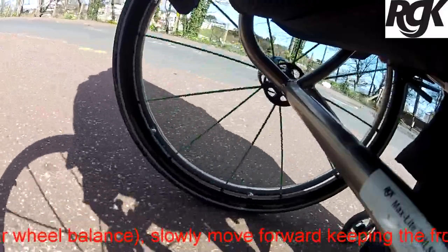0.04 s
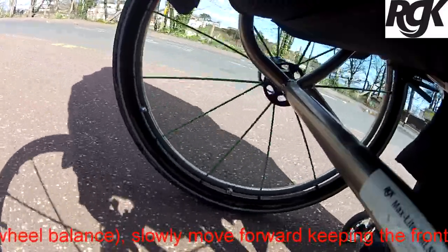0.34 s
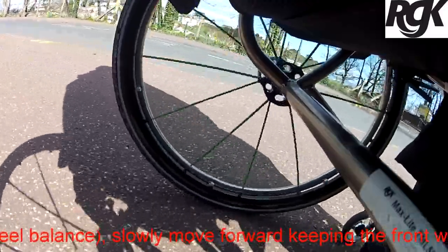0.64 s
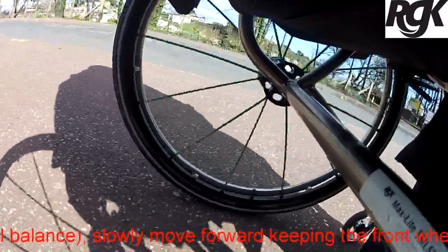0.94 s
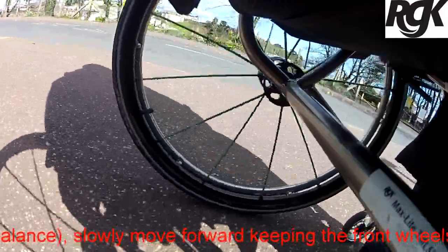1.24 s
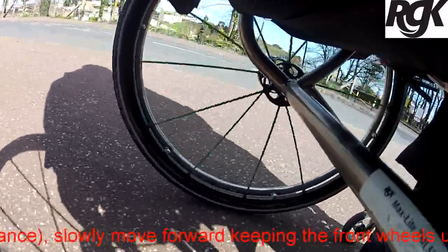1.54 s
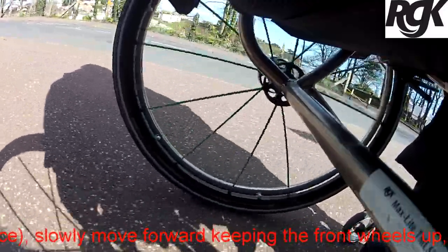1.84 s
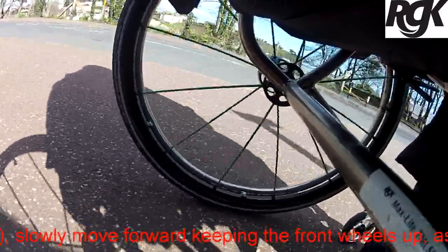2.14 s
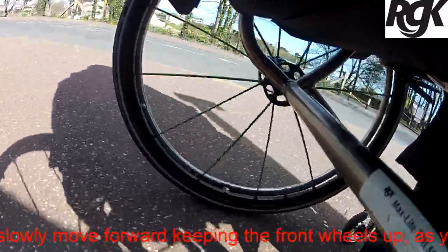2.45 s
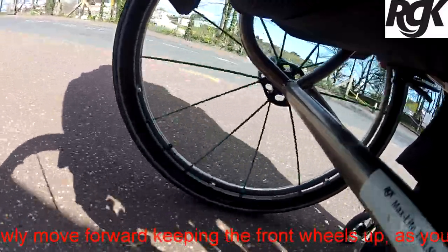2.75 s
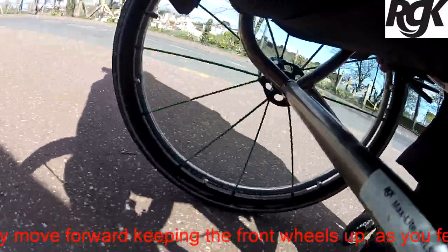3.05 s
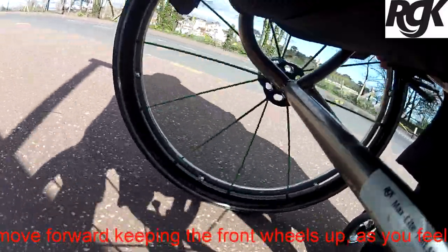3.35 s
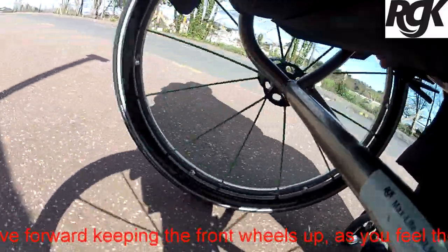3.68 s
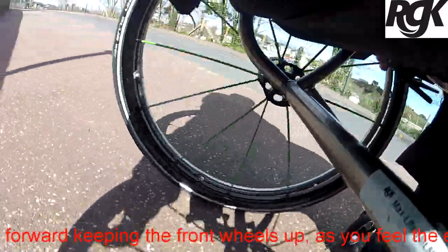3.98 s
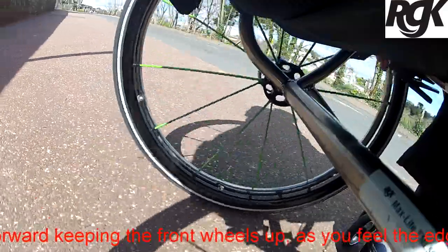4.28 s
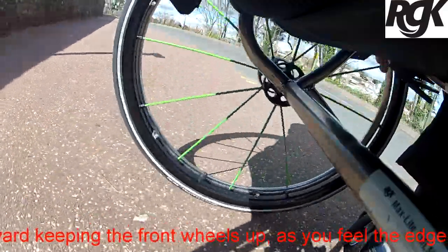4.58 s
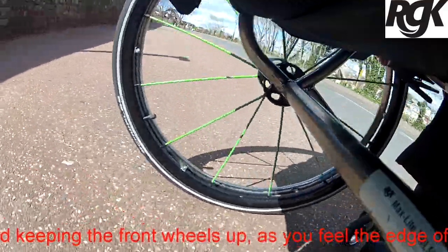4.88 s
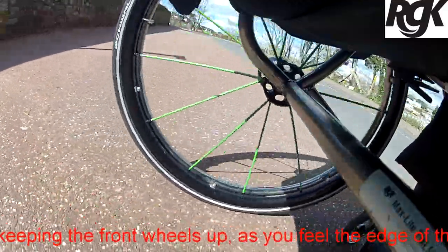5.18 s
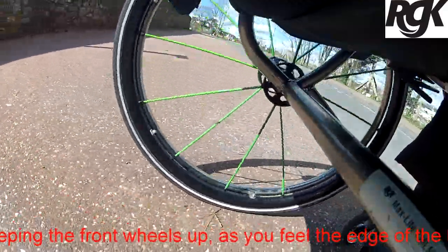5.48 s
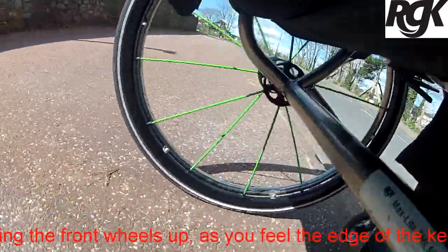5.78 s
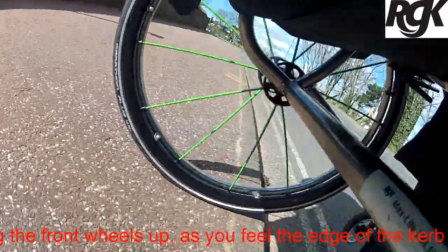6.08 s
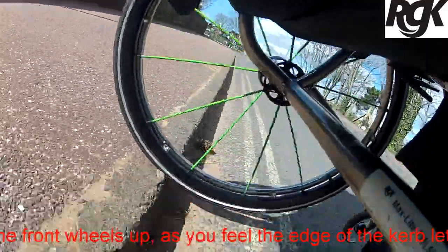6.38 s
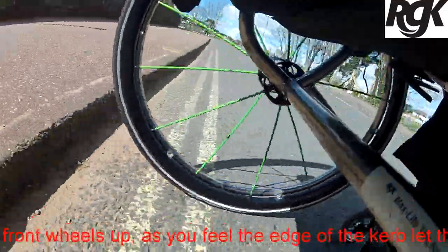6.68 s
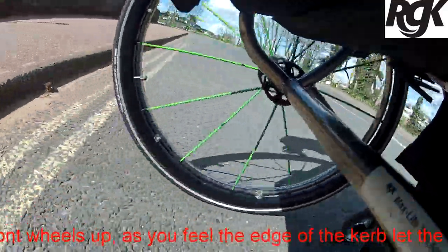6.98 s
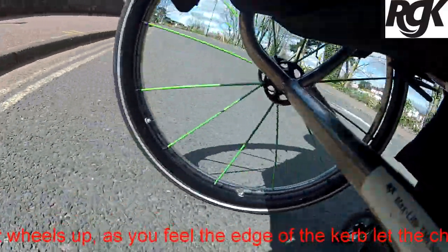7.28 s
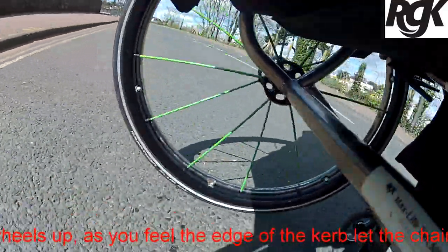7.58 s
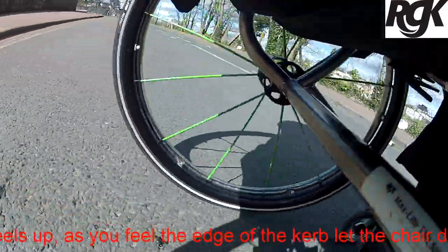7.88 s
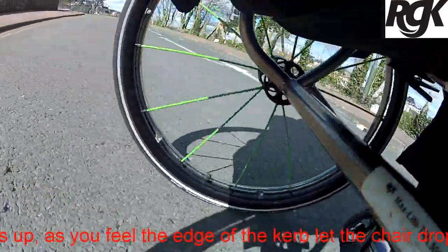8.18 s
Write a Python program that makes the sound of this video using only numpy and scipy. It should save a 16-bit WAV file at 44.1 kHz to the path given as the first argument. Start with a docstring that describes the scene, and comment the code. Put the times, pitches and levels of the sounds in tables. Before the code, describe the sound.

Heard close up from a microphone on its frame, a wheelchair rumbles over rough outdoor pavement with scattered ticks and rattles. Hands brush the push rims and the rolling fades almost away. A sharp metallic crack and clatter follow as the wheels land off a kerb, and the chair carries on along a coarser road with a hollower rumble, crackling grit and busy rattling.

```python
"""Tyre rumble and a ringing frame: a wheelchair rolls on its rear wheels along a gritty pavement.
A loose fitting rattles, grit snaps under the tread, and palms rub the push rims as the chair slows.
At 6.7 s it drops off a kerb with a clatter and rolls on over a rougher road.
A microphone on the frame hears the tyres through the tubes; sample-and-hold adds a metallic fizz."""
import sys
import numpy as np
from scipy import signal
from scipy.io import wavfile
from scipy.ndimage import uniform_filter1d

SR = 44100
rng = np.random.default_rng(int(sys.argv[2]) if len(sys.argv) > 2 else 0)


def log_audio(samples):
    """Write samples as a 16-bit WAV file to the path given in sys.argv[1]."""
    # one column per channel
    frames = np.atleast_2d(samples).T
    # limit to full scale, then quantise
    limited = np.clip(frames, -1, 1)
    pcm = np.round(limited * 32767).astype(np.int16)
    wavfile.write(sys.argv[1], SR, pcm)


N = 371763
TIME_S = np.arange(N) / SR
KERB_S = 6.688

# shaking trend, sinking as the chair slows: (time [s], level re steady rolling [dB])
SHAKE_TREND = [(0, 0.27), (1.9, -.5), (2.3, 0), (2.7, -0.5), (3.9, 0.75), (4.4, 0), (5.1, -2), (5.35, -5),
               (5.65, -4), (5.87, -5.5), (6.0, -13.5), (6.5, -19), (6.66, -18), (6.72, -0.5), (7.15, 2),
               (7.38, -2), (7.5, 2), (8.43, 3)]
# uneven patches: (centre [s], length [s], swell [dB])
BUMP_SWELLS = [(0.173, 0.061, 1), (0.584, .16, 2), (.985, 0.033, 4.5), (1.474, .12, 3), (2.355, .12, 1.5),
               (2.504, 0.21, 2), (2.744, 0.16, 2), (3.033, 0.2, 1), (3.225, 0.092, 2), (3.543, 0.15, 3.5),
               (4.266, 0.071, 3), (5.06, 0.06, 1.5), (6.295, 0.15, 10), (6.949, 0.18, 6),
               (7.123, 0.067, 3.5), (7.497, 0.3, 3.5), (7.629, 0.16, 5), (7.73, 0.073, 4), (7.8, 0.11, 3),
               (7.993, .1, 4.5), (8.181, 0.026, 3.5), (8.413, 0.053, 3.5)]
# tyres on pavement: (frequency [Hz], relative density [dB])
PAVEMENT_SPECTRUM = [(15, -25), (28, -25), (45, -7.5), (65, -5), (97, 2.5), (128, -6), (172, -6),
                     (215, -23.5), (305, -16), (420, -21.5), (530, -25.5), (800, -38), (1500, -68.5)]
# tyres on road: (frequency [Hz], relative density [dB])
ROAD_SPECTRUM = [(15, -19), (35, -16), (55, -11.5), (82, 3.5), (115, -4.5), (160, -9), (220, -21),
                 (310, -11.5), (420, -21.5), (540, -20.5), (800, -29), (1500, -65)]
# tyres landing and meeting bumps: (time [s], level [dB], frequency [Hz], t60 [s])
TYRE_THUMPS = [(6.686, -10, 65, 0.079), (6.688, -10.5, 194, 0.034), (6.715, -36, 310, 0.11),
               (6.79, -15, 116, 0.09), (6.792, -11, 363, 0.031), (6.924, -13.5, 267, .07),
               (7.388, -11, 380, 0.027), (7.609, -19, 394, 0.045), (8.392, -9, 320, 0.02)]
# frame and mount resonances: (frequency [Hz], nominal width [Hz], relative level [dB])
FRAME_MODES = [(642.2, 46.7, 0.5), (706, 63, -2.5), (728, 46, -4), (883.5, 94, -4.5), (1157, 270, -13),
               (1580, 200, -8), (1800, 126, -7), (1965, 87, -11), (2494, 100, -19.5), (2977, 134, -16),
               (3180, 88, -18), (3550, 56, -23), (3874, 153, -24), (4794, 400, -36)]
# jolts ringing one tube: (time [s], level [dB])
TUBE_PINGS = [(1.444, -19), (2.326, -21.5), (2.508, -17), (3.046, -21), (3.24, -19.5), (3.786, -19),
              (6.285, -27), (6.791, -11.5), (6.93, -6), (7.121, -7), (7.6, -12.5), (7.96, -12.5),
              (8.319, -32), (8.402, -11)]
# fine grit: (frequency [Hz], relative density [dB])
GRIT_SPECTRUM = [(300, -11), (600, -16), (1000, 2), (1200, 1), (1380, 2.5), (1850, 6.5), (2100, 0),
                 (2400, -16), (3050, -7), (3600, -25), (4300, -20), (4750, -15), (6000, -32), (7000, -65)]
# snapping stone: (frequency [Hz], relative density [dB])
STONE_SPECTRUM = [(300, -11), (700, 7), (1100, 4), (1500, 8.5), (2000, 10), (2500, 4.5), (3000, 4),
                  (4000, -7), (5000, -10), (6000, -21), (7000, -62)]
# distant murmur: (frequency [Hz], relative density [dB])
OUTDOOR_SPECTRUM = [(15, -31), (60, 9.5), (130, -3.5), (250, 1.5), (420, -9.5), (700, -4), (1000, -30),
                    (2000, -21.5), (5000, -30.5), (7000, -57)]
# loose fitting: (time [s], relative mid level [dB], treble re mid [dB], low ring re mid [dB])
FITTING_CLACKS = [(0.189, -28, -9, -9), (0.208, -30, -1, 5), (.309, -34, -12, 4), (.388, -34, -2, -13),
                  (.6278, -33, 2.5, 10.5), (.6933, -30.5, -0.5, 6), (.714, -35.5, -2, 8),
                  (.859, -29, -1, -8), (.9883, -26, -2, 4), (1.1329, -37, -4, 9),
                  (1.4418, -18.5, -12.5, -1.5), (1.687, -35, -3, 11), (1.82, -39, -12, -4),
                  (2.3261, -26.5, -4, 5), (2.3357, -32, -18, 10), (2.5136, -43, 4.5, -10),
                  (2.756, -33.5, -7, 12.5), (2.82, -33, -1.5, 9.5), (2.9948, -38.5, -1, 11),
                  (3.2587, -27.5, -9.5, -2), (3.5255, -29, -1.5, -12), (3.5738, -28.5, -5, -9),
                  (3.6812, -33.5, -8, 9.5), (3.7433, -30.5, -11, 2), (3.787, -31, -10, 5),
                  (6.2836, -33, -12, 5.5), (6.7185, -19.5, -5, 7), (6.7389, -17, -4.5, -5),
                  (6.7877, -17, -18, 5), (6.8022, -26.5, -2, 6), (6.8269, -31, -6, 10),
                  (6.879, -28.5, 3, -2), (6.9188, -15.5, -10.5, 0), (6.932, -21, -5, 6),
                  (6.9587, -14, -3.5, -0.5), (7.0462, -20.5, -2, 3.5), (7.087, -30.5, -4, 6),
                  (7.1215, -28.5, 6, -2), (7.1645, -22, -5, 7.5), (7.2919, -20, -6.5, 0),
                  (7.3756, -36.5, -13, 16), (7.448, -15, -10.5, 1), (7.476, -15, -12, -15),
                  (7.4839, -14, -20, 3.5), (7.499, -20, -2.5, 2), (7.5138, -19, -13, 5),
                  (7.5419, -21, -16, -10), (7.56, -26, -5, 3), (7.593, -25, -7, -2), (7.6095, -22, -8, 2),
                  (7.63, -22, 6, -17), (7.6487, -24, 4, 14.5), (7.6661, -23, 2, -2), (7.7045, -14, -11, 2),
                  (7.7142, -16, -26, 4), (7.7665, -21.5, 0, -8), (7.7969, -22.5, -8, 2.5),
                  (7.8183, -32, 2, 5), (7.88, -28, -7, -5), (7.9566, -24.5, -1, 4), (7.978, -17, -20, -3),
                  (8.0024, -20, 2.5, 0), (8.1084, -18.5, -7.5, 1.5), (8.1517, -21, -16, -9),
                  (8.173, -20.5, -1, 7.5), (8.2405, -20, -7, 4.5), (8.2954, -25, 0, 8.5),
                  (8.3208, -28.5, -1, 9.5), (8.3417, -26.5, -6, -3), (8.3925, -26, -1.5, 9)]
# grit snapping: (time [s], relative mid level [dB], treble re mid [dB], low knock re mid [dB])
GRIT_SNAPS = [(2.921, -29, -8.5, -4), (3.81, -28.5, -22, -4), (3.923, -23, -14, -2.5),
              (4.404, -28.5, -16, -10), (4.429, -24, -21, -11), (4.996, -36.5, -6, -2),
              (5.512, -31, -9, -15), (5.699, -41, -10, -8), (5.824, -42.5, 1, 6), (5.893, -27, -9, -22)]
# palm on rim: (frequency [Hz], relative density [dB])
RUB_SPECTRUM = [(500, -8), (1200, 3), (1450, 3), (1850, 9), (2100, 7), (2400, -1.5), (3100, -15),
                (3700, -41), (4300, -30), (4750, -13.5), (6000, -28), (7000, -55)]
# palms braking: (start [s], length [s], initial level [dB])
RUB_STROKES = [(3.2, 0.2, -43.5), (3.85, 1.27, -39), (5.42, 0.17, -48.5), (5.88, 0.11, -52),
               (6.36, 0.44, -53)]
# tight grip hissing: (frequency [Hz], relative density [dB])
SLIP_SPECTRUM = [(500, 2), (1400, -1.5), (2050, 5.5), (2400, -5), (3200, 1), (3700, -5.5), (4100, -4),
                 (5000, -8), (6000, -18), (7000, -52)]
# tight grip slipping: (start [s], length [s], relative initial level [dB])
SLIP_STROKES = [(4.03, 0.027, -38), (5.18, 0.26, -51), (5.8, 0.083, -45.5), (6.105, 0.302, -46),
                (6.6, 0.12, -45.5)]
# skin catching on the rim: (time [s], level [dB], frequency [Hz], t60 [s])
SKIN_SQUEAKS = [(5.865, -40, 3230, .03), (6.11, -26.5, 3200, 0.046)]
# metal on metal: (frequency [Hz], relative density [dB])
METAL_SPECTRUM = [(300, -18), (700, -5), (1100, -4.5), (1500, -8), (2050, 7), (2600, -6), (3200, 4.5),
                  (4100, -5), (5000, -0.5), (6000, -18), (7000, -41)]
# kerb impacts: (time [s], relative mid level [dB], treble re mid [dB], low knock re mid [dB])
METAL_CRACKS = [(6.6915, -8.5, -9, -3.5), (6.7583, -14, 1, -3.5), (6.788, -21, -8, 12)]
# wheels landing in turn: (time [s], relative clatter level [dB])
WHEEL_LANDINGS = [(6.692, -25.5), (6.79, -40)]


def amp(db):
    """dB to gain."""
    return 10 ** (np.asarray(db) / 20)


def unit_rms(x):
    """Scale to rms 1."""
    return x / np.sqrt(np.mean(x ** 2) + 1e-20)


def add(mix, start_s, sound):
    """Mix a sound in at start_s."""
    start = round(start_s * SR)
    sound = sound[max(-start, 0):]
    part = mix[max(start, 0):][:len(sound)]
    part += sound[:len(part)]


def band(x, lo_hz, hi_hz):
    """Causal band-pass."""
    return signal.sosfilt(signal.butter(3, [lo_hz, hi_hz], "band", fs=SR, output="sos"), x)


def through(x, response):
    """Convolve, keeping the length."""
    return signal.oaconvolve(x, response)[:len(x)]


def minimum_phase(gain_at_hz, size=8192):
    """Minimum-phase impulse response of a gain curve."""
    bins_hz = abs(np.fft.fftfreq(size, 1 / SR))
    log_gain = np.log(np.maximum(gain_at_hz(bins_hz), 1e-5))
    spectrum = np.exp(np.conj(signal.hilbert(log_gain)))
    return np.fft.ifft(spectrum).real[:size // 2]


def colour(spectrum):
    """Impulse response of a spectrum table."""
    hz, db = np.transpose(spectrum)
    return minimum_phase(lambda f: amp(np.interp(np.log(f + 1), np.log(hz), db)))


def impacts(per_s, spread_db):
    """Random contact impulses; positive spread makes a few large, negative a few small."""
    strength = amp(spread_db * np.minimum(rng.exponential(1, N), 4)) * rng.choice([-1, 1], N)
    return strength * (rng.random(N) < per_s / SR)


def steadied(x, window_s, share):
    """Constant load: remove a share of the slow swells; rms 1."""
    size = int(window_s * SR) + 1
    power = uniform_filter1d(uniform_filter1d(x ** 2, size), size)
    return unit_rms(x / (abs(power) + 1e-20) ** (share / 2))


def mode(db, hz, t60_s, rise_s):
    """One decaying resonance."""
    t = np.arange(SR // 4) / SR
    return amp(db - 60 * t / t60_s) * (1 - np.exp(-t / rise_s)) * np.sin(2 * np.pi * hz * t)


def on_road():
    """0 on pavement, 1 on road; 10 ms ramp at the kerb."""
    return np.clip((TIME_S - KERB_S) / 0.01, 0, 1)


def shaking():
    """Ground-shake gain: slow trend plus a smooth swell per bump."""
    swells_db = sum(db * np.cos(np.pi * np.clip((TIME_S - centre_s) / length_s, -0.5, 0.5)) ** 2
                    for centre_s, length_s, db in BUMP_SWELLS)
    return amp(np.interp(TIME_S, *np.transpose(SHAKE_TREND)) + swells_db)


def tyres():
    """Air-filled tyres rumble over stones, hollower on the road, and thump on bumps."""
    stones = impacts(per_s=4000, spread_db=2)
    pavement = steadied(through(stones, colour(PAVEMENT_SPECTRUM)), window_s=0.079, share=0.45)
    road = steadied(through(stones, colour(ROAD_SPECTRUM)), window_s=0.079, share=0.45)
    out = shaking() * (amp(-27.5) * (1 - on_road()) * pavement + amp(-26) * on_road() * road)
    for time_s, db, hz, t60_s in TYRE_THUMPS:
        add(out, time_s, mode(db, hz, t60_s, rise_s=0.00028))
    return out


def frame_response(scatter_db=0, damping=1):
    """Steep-sided frame resonances; scatter stands for the point struck."""
    modes = [(hz, 0.54 * width_hz * damping, db + scatter_db * rng.standard_normal())
             for hz, width_hz, db in FRAME_MODES]

    def gain(f):
        powers = (amp(db) ** 2 / (1 + ((f - hz) / half_hz) ** 2) ** 2 for hz, half_hz, db in modes)
        return np.sqrt(sum(powers))
    return minimum_phase(gain)


def frame(shake_exponent=1.91):
    """Stones keep the lowest mode humming; the road favours higher ones; jolts ping one tube."""
    shaken = through(impacts(per_s=900, spread_db=2.5), frame_response())
    ring = steadied(band(shaken, 452, 1050), window_s=0.12, share=0.47)
    lowest_mode = mode(0, hz=648, t60_s=0.074, rise_s=0.0063)
    hum = steadied(through(impacts(per_s=2500, spread_db=2), lowest_mode), window_s=0.051, share=0.55)
    struck = through(impacts(per_s=540, spread_db=3), frame_response())
    chatter = unit_rms(band(struck, 1090, 9000))
    out = amp(-32.8 - 6 * on_road()) * hum
    out += amp(-37 + 5 * on_road()) * ring
    out += amp(-50.5 + 5 * on_road()) * chatter
    out *= shaking() ** shake_exponent
    for time_s, db in TUBE_PINGS:
        hz = 895 * (1 + 0.014 * rng.standard_normal())
        add(out, time_s, mode(db, hz, t60_s=0.087, rise_s=0.001))
    return out


def tread(shake_exponent=1.13):
    """Fine grit hisses under the tread; gravel crackles, louder on the road."""
    grit = unit_rms(through(impacts(per_s=9000, spread_db=4), colour(GRIT_SPECTRUM)))
    gravel = unit_rms(through(impacts(per_s=240, spread_db=5), colour(STONE_SPECTRUM)))
    return shaking() ** shake_exponent * (amp(-46) * grit + amp(-58 + 3.8 * on_road()) * gravel)


def outdoors():
    """Faint steady air and far traffic."""
    return amp(-42.5) * unit_rms(through(rng.standard_normal(N), colour(OUTDOOR_SPECTRUM)))


def fitting_taps(shake_exponent=2.34, fall_s=0.004):
    """The loose fitting taps the frame at random: faster on the road, harder with more shake."""
    contacts = (1 - on_road()) * impacts(per_s=16, spread_db=1.5)
    contacts += on_road() * impacts(per_s=55, spread_db=0.5)
    envelope = through(abs(contacts), np.exp(-np.arange(SR // 20) / SR / fall_s))
    taps = through(envelope * rng.standard_normal(N), frame_response(damping=1.77))
    mid, treble = unit_rms(band(taps, 950, 2120)), unit_rms(band(taps, 2860, 7800))
    gain = shaking() ** shake_exponent * amp(-50.5 + 3.3 * on_road())
    return gain * (mid + amp(-7 + 3.8 * on_road()) * treble)


def strike(mix, row, response, rise_s, fall_s, lead_s, size=4096):
    """Mix in one blow: a flurry of tiny contacts excites a body, levelled in three bands."""
    time_s, mid_db, treble_db, low_db = row
    t = np.arange(size) / SR - 0.01
    envelope = np.exp(np.where(t < 0, -(t / rise_s) ** 4, -t / fall_s))
    struck = through(rng.standard_normal(size) * envelope, response)
    window = np.hanning(220)
    blow = np.zeros(size)
    for lo_hz, hi_hz, db in ((460, 835, low_db), (1046, 2090, 0), (2645, 6100, treble_db)):
        part = band(struck, lo_hz, hi_hz)
        peak_rms = np.sqrt(through(part ** 2, window / window.sum()).max())
        blow += amp(mid_db + db) * part / peak_rms
    add(mix, time_s + t[0] - lead_s, blow)  # lead: the body takes a moment to swing up


def fitting_clacks(points=7):
    """The fitting's hardest hits ring the frame, damped by the contact."""
    out = np.zeros(N)
    responses = [frame_response(scatter_db=3, damping=1.51) for _ in range(points)]
    for row in FITTING_CLACKS:
        strike(out, row, responses[rng.integers(points)], rise_s=0.0031, fall_s=0.0042, lead_s=0.0005)
    return amp(-0.1) * out


def grit_snaps():
    """Single stones snap under the tyres, short and dry."""
    out, stone = np.zeros(N), colour(STONE_SPECTRUM)
    for row in GRIT_SNAPS:
        strike(out, row, stone, rise_s=0.0023, fall_s=0.0023, lead_s=0.0005)
    return amp(2) * out


def strokes(rows, attack_s, drift_db_per_s, release_s):
    """Hand-stroke gain: press, ease or tighten steadily, let go."""
    gain = np.zeros(N)
    for start_s, length_s, db in rows:
        t = np.maximum(TIME_S - start_s, 0)
        held = amp(db + drift_db_per_s * np.minimum(t, length_s))
        release = np.exp(-np.maximum(t - length_s, 0) / release_s)
        gain += np.minimum(t / attack_s, 1) * held * release
    return gain


def hands():
    """Palms brake the push rims with a soft rub; a tight grip hisses, scratches and squeaks."""
    rub = unit_rms(through(impacts(per_s=4700, spread_db=3.5), colour(RUB_SPECTRUM)))
    hiss = unit_rms(through(impacts(per_s=9400, spread_db=-1.5), colour(SLIP_SPECTRUM)))
    scratch = unit_rms(through(impacts(per_s=260, spread_db=6), colour(SLIP_SPECTRUM)))
    rub_gain = strokes(RUB_STROKES, attack_s=0.047, drift_db_per_s=-6, release_s=0.12)
    slip_gain = strokes(SLIP_STROKES, attack_s=0.0089, drift_db_per_s=9, release_s=0.0088)
    out = rub_gain * rub + slip_gain * (amp(-2.5) * hiss + amp(-8.5) * scratch)
    for time_s, db, hz, t60_s in SKIN_SQUEAKS:
        add(out, time_s, mode(db, hz, t60_s, rise_s=0.009))
    return out


def metal_cracks():
    """Metal strikes metal as the chair lands."""
    out, metal = np.zeros(N), colour(METAL_SPECTRUM)
    for row in METAL_CRACKS:
        strike(out, row, metal, rise_s=0.002, fall_s=0.001, lead_s=0.00018)
    return amp(-0.3) * out


def landing_clatter(t60_s=0.39):
    """Each wheel's landing sets the loose parts clattering and the seat booming."""
    shaken = through(impacts(per_s=1100, spread_db=8), frame_response())
    ring = unit_rms(band(shaken, 810, 5500))
    ticks = unit_rms(through(impacts(per_s=1100, spread_db=-3), colour(STONE_SPECTRUM)))
    boom = unit_rms(band(impacts(per_s=2000, spread_db=8.5), 200, 355))
    envelope = sum((TIME_S > time_s) * amp(db - 60 * abs(TIME_S - time_s) / t60_s)
                   for time_s, db in WHEEL_LANDINGS)
    return envelope * (ring + amp(1) * ticks + amp(2) * boom)


def scene():
    """Mono sum at the microphone."""
    rolling = tyres() + frame() + tread() + hands()
    knocks = fitting_clacks() + grit_snaps() + metal_cracks() + fitting_taps() + landing_clatter()
    return (rolling + knocks + outdoors())[None]


def record(dry, hold_hz=12000, cutoff_hz=15550):
    """Clip, sample-and-hold, low-pass; the slow hold clock mirrors the sound into the treble."""
    oversampled = signal.resample_poly(dry, 4 * hold_hz, SR, axis=1)
    held = np.repeat(np.clip(oversampled[:, ::4], -1, 1), 4, axis=1)
    out = signal.resample_poly(held, SR, 4 * hold_hz, axis=1)[:, :N]
    lowpass = signal.firwin(255, cutoff_hz, window=("kaiser", 9), fs=SR)
    return signal.oaconvolve(out, lowpass[None], "same")


dry = scene()
out = record(dry)
log_audio(out)
```